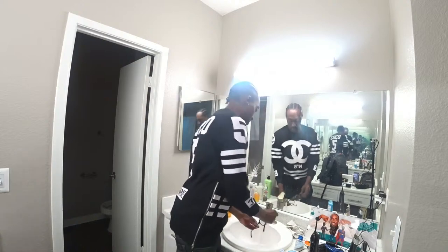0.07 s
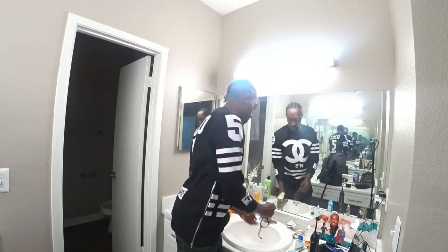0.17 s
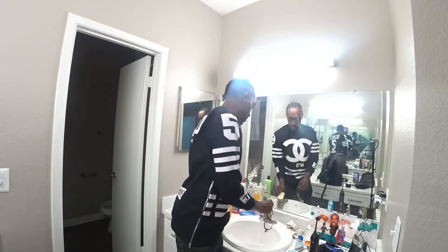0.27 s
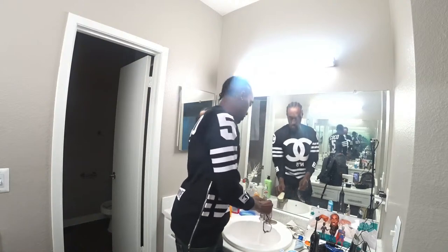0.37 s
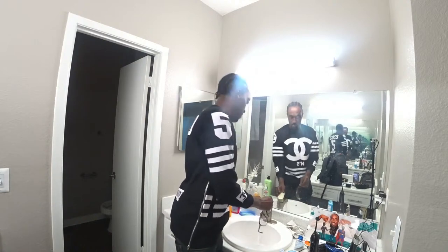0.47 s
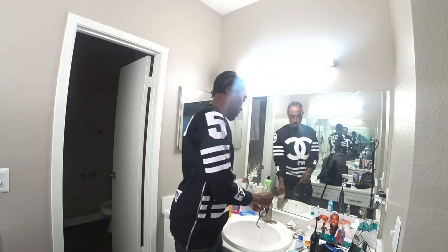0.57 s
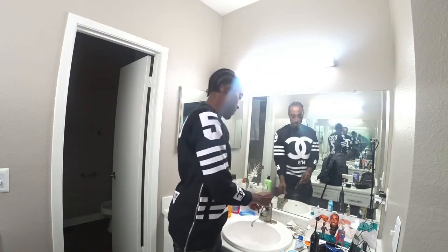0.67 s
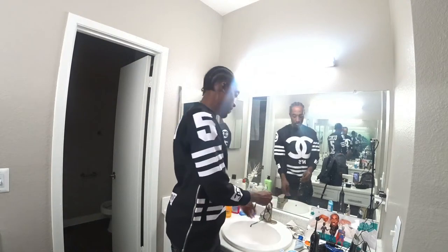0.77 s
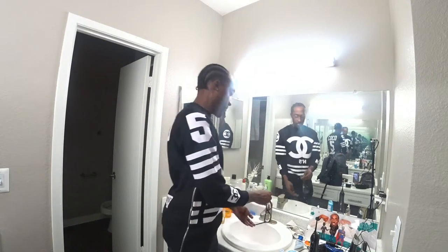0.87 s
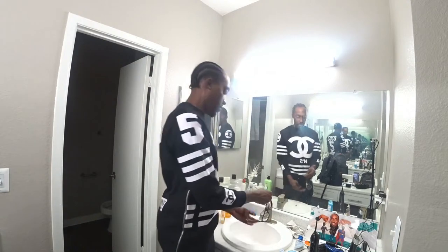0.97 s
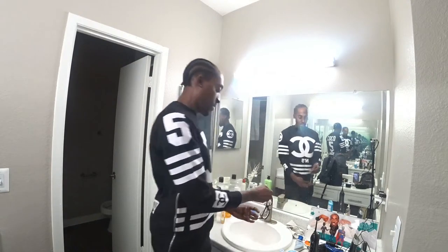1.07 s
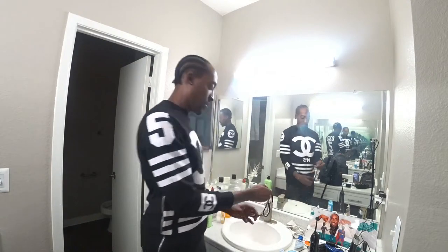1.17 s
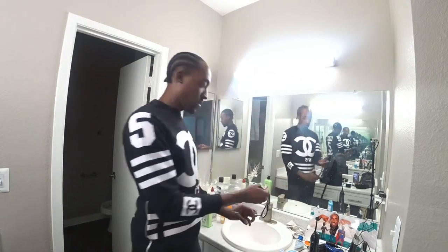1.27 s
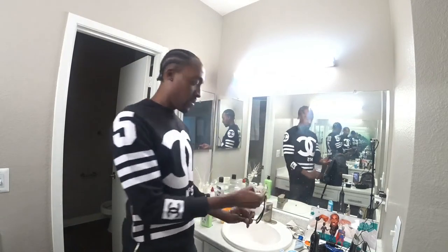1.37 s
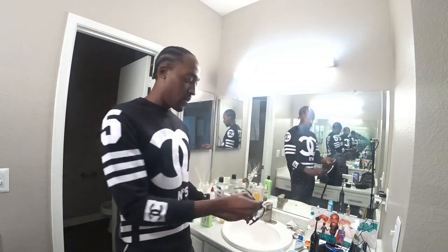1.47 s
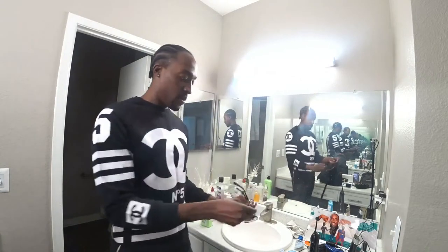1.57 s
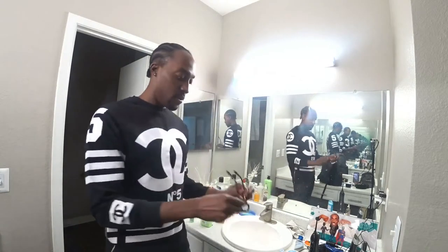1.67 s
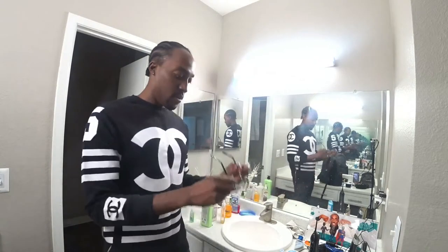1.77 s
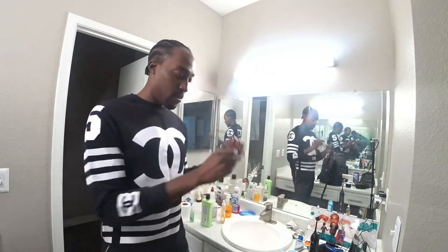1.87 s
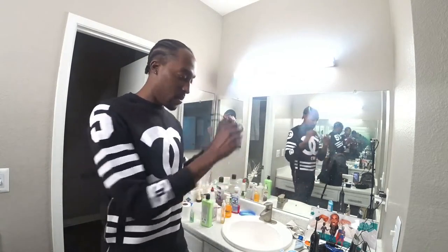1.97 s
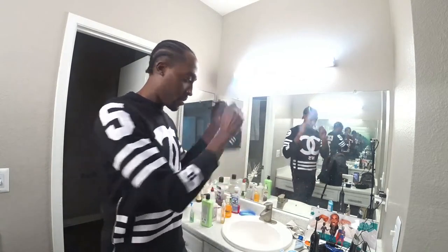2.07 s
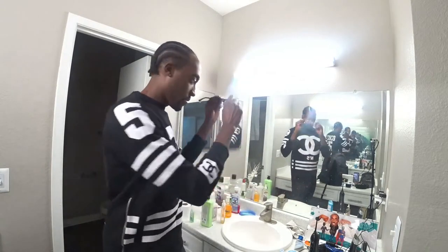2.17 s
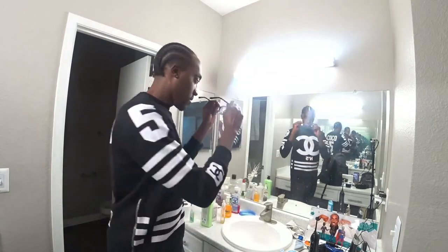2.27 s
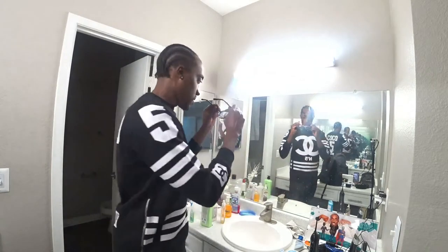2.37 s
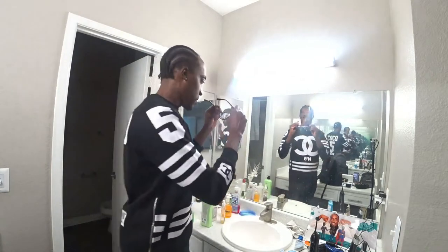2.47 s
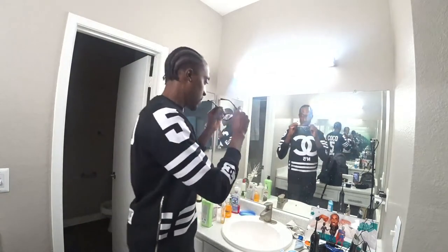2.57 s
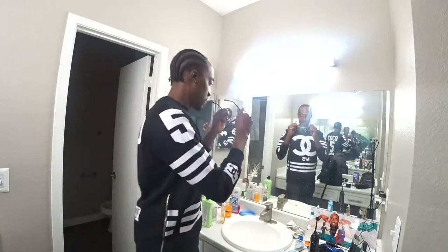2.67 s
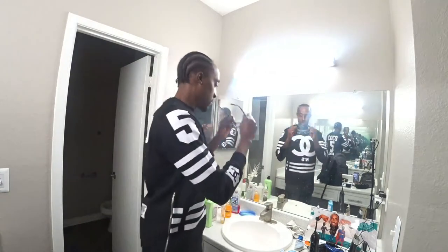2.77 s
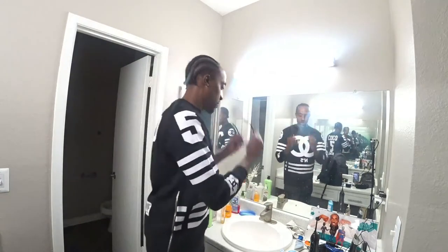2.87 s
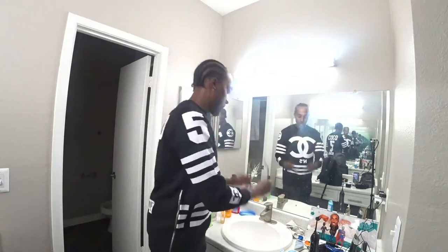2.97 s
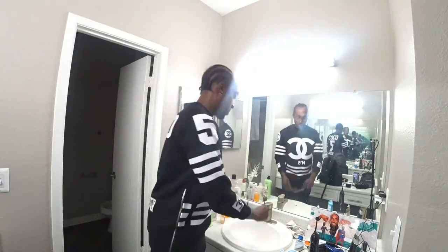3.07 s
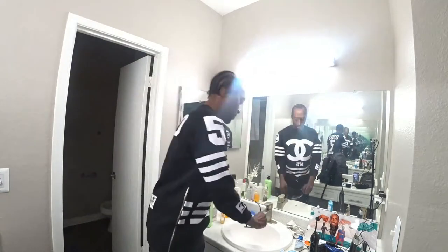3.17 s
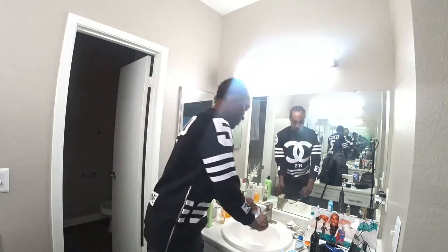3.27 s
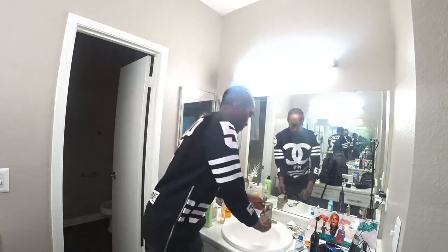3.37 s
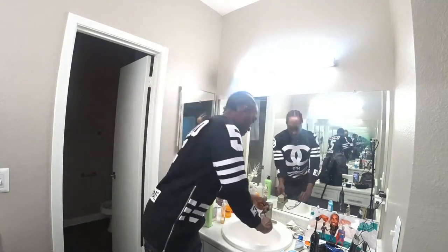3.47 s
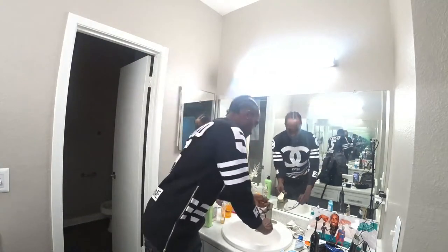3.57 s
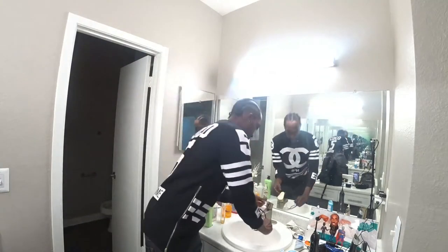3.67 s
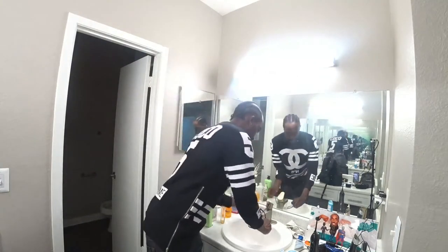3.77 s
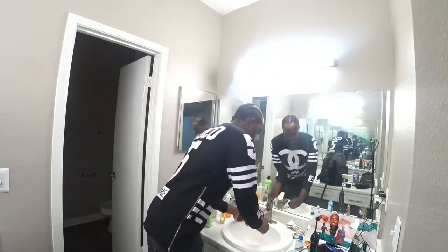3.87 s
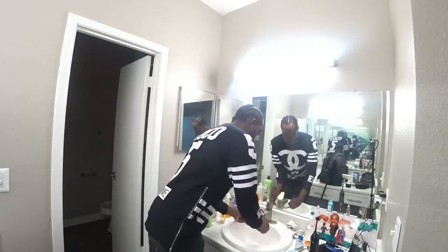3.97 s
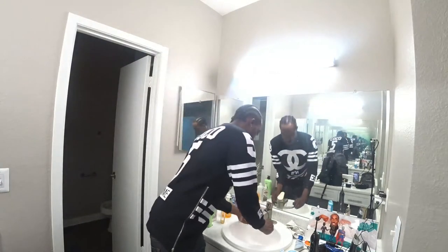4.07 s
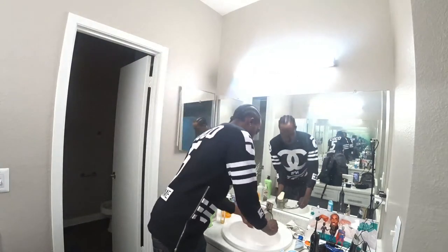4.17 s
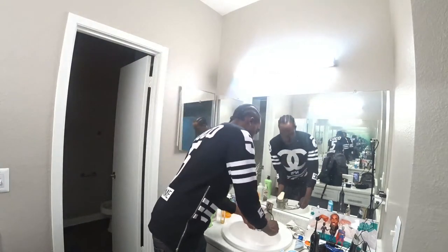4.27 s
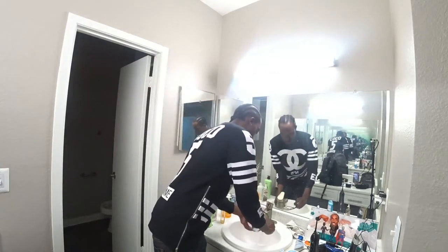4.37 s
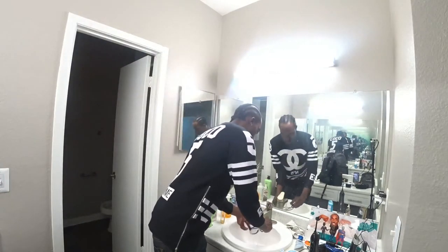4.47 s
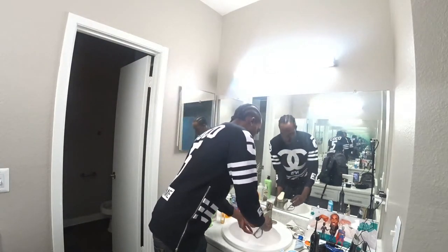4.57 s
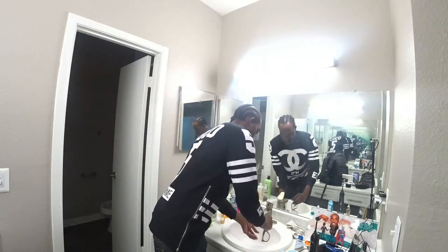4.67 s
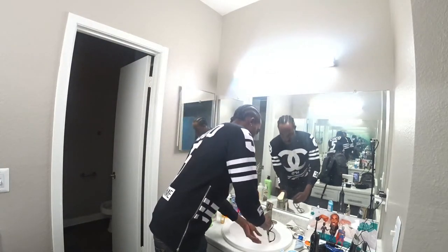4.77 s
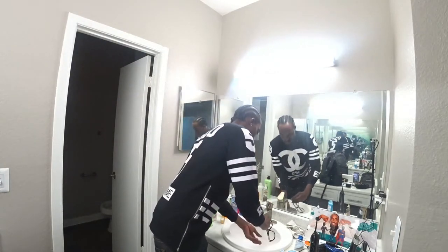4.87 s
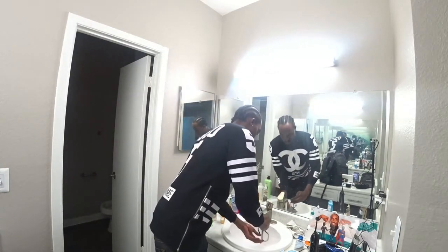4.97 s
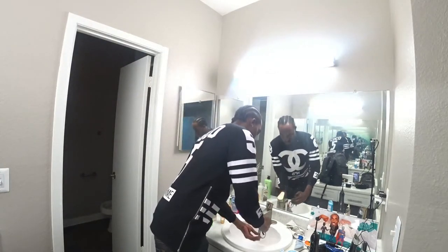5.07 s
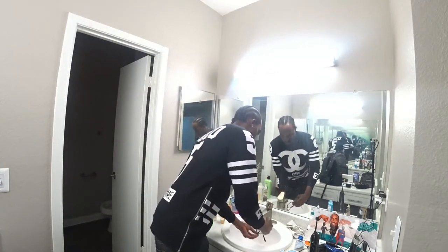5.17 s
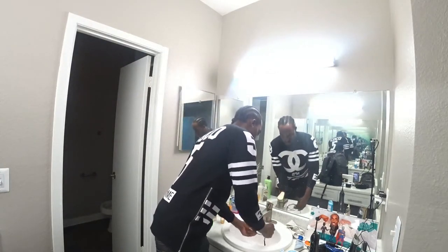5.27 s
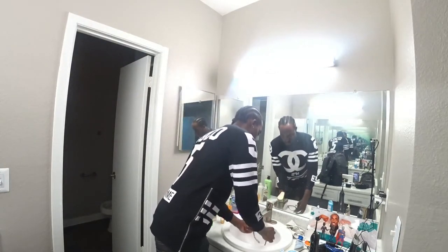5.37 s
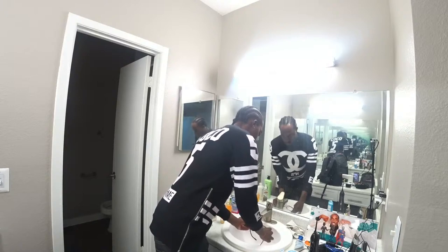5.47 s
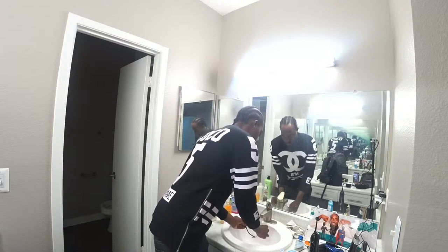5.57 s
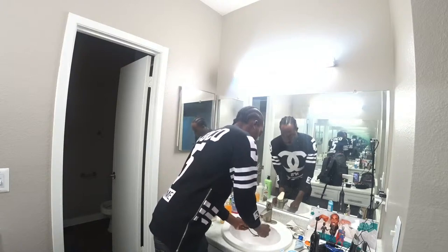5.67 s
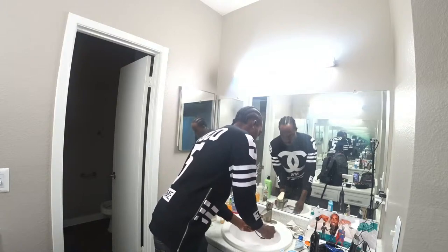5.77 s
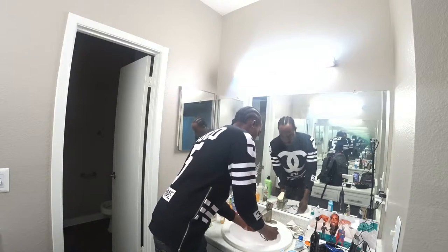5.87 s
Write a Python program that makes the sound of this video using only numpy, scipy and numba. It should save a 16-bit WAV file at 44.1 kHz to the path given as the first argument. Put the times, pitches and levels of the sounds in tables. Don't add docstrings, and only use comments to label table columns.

```python
import sys
import numpy as np
from scipy import signal
from scipy.fft import rfft, irfft
from scipy.io import wavfile
from scipy.ndimage import uniform_filter1d
from numba import njit

SR = 44100
rng = np.random.default_rng(int(sys.argv[2]) if len(sys.argv) > 2 else 0)


def wrap_up_sound(samples):
    columns = np.atleast_2d(samples).T
    tamed = np.clip(columns, -1, 1)
    steps = np.round(tamed * 32767).astype(np.int16)
    wavfile.write(sys.argv[1], SR, steps)


def decibels_to_gain(level_db):
    exponent = np.asarray(level_db, float) / 20
    return 10 ** exponent


N = 261072
TIME = np.arange(N) / SR

# [Hz, dB per Hz]
JET_SPECTRUM = [(2350, 9.5), (4000, -3.5), (7230, 2.5), (9300, 2.5), (10400, 7.5), (13300, 2.5),
                (14000, -2)]
# [Hz, dB per Hz]
SPLASH_SPECTRUM = [(760, -22), (1300, -5.5), (1390, -5.5), (1510, -9.5), (1880, -2), (2140, -3), (2400, -2),
                   (7000, 0), (9100, 13.5), (15400, -120)]
# [Hz, Hz, dB]
BASIN_MODES = [(186, 31, 6.5), (292, 50, -1), (358.5, 4.9, -1.5), (461, 85, 5), (840, 200, 5.5),
               (1016, 87, 1.5), (1737, 51, 4.5), (2380, 110, -30)]
# [s, s, dB, dB, dB]
TAP_OPEN = [
    (-.1, 0.566, -47, -46.5, -53),
    (3.467, 6.5, -46.5, -46, -54.5),
]
# [s, dB]
HAND_IN_JET = [
    (3.65, 2.5),
    (4.08, -1),
    (4.32, 4.5),
    (4.37, -1.5),
    (5.05, 4),
    (5.08, 0.5),
    (5.47, -3),
    (5.52, 1),
    (5.62, -4),
]
# [s, dB, s, s]
WATER_SLAPS = [(.02, -47, 0.3, 0.7), (.462, -59, 0.084, 0.071), (4.105, -42, 0.064, 0.35),
               (4.17, -45, 0.13, .2), (4.189, -25.5, 0.063, 0.089), (4.225, -37, 0.13, 0.4),
               (4.305, -37.5, 0.26, 0.33), (4.53, -42, 0.55, 0.28), (4.612, -36.5, 0.095, 0.14),
               (4.745, -43, 0.25, 0.1), (5.505, -42, 0.087, 0.22), (5.805, -39.5, 0.093, 0.26)]
# [s, dB]
BOWL_SLOSHES = [
    (.22, -57),
    (0.453, -40),
    (3.522, -46),
    (3.82, -64),
    (4.19, -57),
    (4.28, -55),
    (5.565, -48.5),
]
# [Hz, dB]
FAN_TONES = [
    (120, -66.5),
    (654, -70.5),
    (1297, -86),
    (1809, -81),
]
# [Hz, dB per Hz]
AIR_SPECTRUM = [(12, -38), (20, -1), (75, -4), (119, -5.5), (174, -10.5), (468, -13.5), (650, -12),
                (725, -15), (1440, -18), (1790, -18), (4680, -28), (12500, -35), (14000, -42)]
# [s, dB, Hz, dB, Hz]
BLOWS = [(0.348, -40.5, 75, -18, 250), (.447, -38, 115, 8, 430), (.455, -38.5, 150, 3.5, 530),
         (0.4688, -13.5, 76, -24, 162), (.523, -42, 90, -23, 199), (0.57, -43, 109, -24, 200),
         (.645, -43, 70, -8, 200), (.678, -43, 105, -18, 200), (1.472, -36.5, 41.3, -13, 260),
         (2.151, -37.5, 41, -4, 280), (3.297, -38, 99, -20, 249), (3.377, -44, 62, -22, 300),
         (3.452, -40.5, 70, -10, 248), (3.526, -28, 93, -33, 403), (3.814, -41.5, 91.5, -15, 434)]
# [s, dB, Hz, s, dB]
CONTACTS = [(0.4505, -31, 1750, 0.045, -26), (0.4566, -27, 1730, 0.045, -27), (.464, -30, 920, 0.046, -21),
            (0.7885, -57.5, 1620, 0.14, 4.5), (.748, -53, 4500, .04, -12), (.87, -61, 6450, .05, -20),
            (.845, -56, 2800, 0.087, -14), (0.9207, -43.5, 2690, 0.07, -20), (.94, -52, 2800, .06, -20),
            (1.001, -48, 2700, 0.05, -17), (1.2997, -45.5, 2540, 0.07, -18),
            (1.4954, -50.5, 3010, 0.05, -4), (2.4546, -55.5, 3540, 0.037, -9), (2.7915, -58, 2400, .05, -9),
            (3.1035, -55, 2540, 0.09, -26), (3.103, -47, 1040, 0.087, -28), (3.225, -52.5, 2750, 0.045, -3),
            (2.155, -54, 1194, 0.11, -25), (3.363, -45, 2410, 0.16, -18), (4.15, -34.5, 1500, 0.22, -18),
            (4.18, -15, 2890, 0.039, -5), (4.1866, -15.5, 3840, 0.037, -15),
            (4.184, -25.5, 1310, 0.082, -20), (4.196, -16, 2700, .05, -23), (4.2113, -29, 3500, 0.027, -23),
            (4.219, -28, 2980, 0.036, -20), (4.605, -31.5, 2500, .09, -4.5)]
# [times pitch, dB]
OBJECT_MODES = [(1, 10.5), (1.6, 9), (8.1, -6), (0.95, -24), (2.3, 2.5)]
# [s, dB, s, s, dB]
RUSTLES = [(.797, -67, 0.05, 0.29, -4), (1.05, -65, 2.2, 0.67, 14.5), (1.42, -62, 0.92, 0.62, 9.5),
           (1.5, -65.5, 0.42, 0.32, 12.5), (1.69, -71, 0.56, .3, 16), (1.985, -63.5, 0.55, 0.5, 10),
           (2.16, -58, 0.05, 0.31, 1), (2.2, -55, 0.17, 0.27, 2), (2.235, -57, .15, 0.18, 7),
           (2.8, -75, .2, .2, -4), (3.11, -74.5, 0.71, 1.2, 20.5), (3.227, -67, 0.068, 0.63, 14),
           (3.375, -64.5, 0.15, 0.48, 14.5)]
# [s, dB, Hz, s]
DRAIN_BUBBLES = [
    (4.781, -44, 835, 0.052),
    (5.554, -42, 848, 0.051),
    (5.573, -46, 920, 0.05),
    (5.583, -39, 1413, 0.053),
    (5.646, -46.5, 810, 0.098),
    (5.747, -33.5, 1026, 0.073),
    (5.769, -37, 1127, 0.049),
]
# [Hz, dB]
PORT_DIFFERENCE = [(35, -30), (85, -22), (180, -14.5), (350, -9.5), (700, -5.5), (2800, -8), (5600, -4),
                   (10000, -1), (13500, 0)]

OPENING_T60_S, JET_STOP_T60_S, SPLASH_STOP_T60_S = 0.11, 0.48, 0.062
BOWL_STOP_T60_S, DRAIN_T60_S, TRICKLE_DB = 1, 4.6, -11.5
SLOSH_RISE_S, SLOSH_FALL_S = 0.064, 0.16
COUNTER_T60_S, FLOOR_T60_S, FLOOR_BELOW_HZ = 0.083, 0.34, 50
ROOM_T60_S, ROOM_DB = 0.26, -8


def level(x, db):
    return x * decibels_to_gain(db) / np.sqrt(np.mean(x ** 2))


def colour(x, points):
    hz, db = np.transpose(points)
    f = np.maximum(np.fft.rfftfreq(x.shape[-1], 1 / SR), 1)
    gain = decibels_to_gain(np.interp(np.log(f), np.log(hz), db))
    return irfft(rfft(x) * gain, x.shape[-1])


def band(x, hz, width):
    return signal.lfilter(*signal.iirpeak(hz, hz / width, SR), x)


def walk(rate):
    k = int(SR / rate)
    held = np.repeat(rng.standard_normal(N // k + 1), k)
    return 1.39 * uniform_filter1d(uniform_filter1d(held, k), k)[:N]


@njit
def ring(s, hz, t60, size, glide):
    out = np.zeros(N)
    for k in range(len(s)):
        n = int(t60[k] * SR)
        first = int(s[k] * SR)
        p = np.exp(2j * np.pi * hz[k] / SR - np.log(1000) / n)
        turn = np.exp(2j * np.pi * hz[k] * glide / SR / n)
        z = size[k] + 0j
        for i in range(first, min(first + n, N)):
            out[i] += z.imag
            z *= p
            p *= turn
    return out


def swell(s, rise_s, fall_s, hold_s=0.):
    early = np.maximum(s - TIME, 0)
    late = np.maximum(TIME - s - hold_s, 0)
    return np.exp(-np.log(1000) * (early / max(rise_s, .01) + late / max(fall_s, .01)))


def burst(s, t60, rise_s):
    t = np.maximum(TIME - s, 0)
    return (1 - np.exp(-t / rise_s)) * np.exp(-np.log(1000) * t / t60)


def droplets(per_s, low_hz, high_hz, cycles, scatter_db):
    s, pitch = rng.random((int(per_s * N / SR), 2)).T
    hz = low_hz * (high_hz / low_hz) ** pitch
    size = decibels_to_gain(scatter_db * np.minimum(rng.exponential(size=len(s)), 4))
    return level(ring(s * N / SR, hz, cycles / hz, size * np.sqrt(hz), 0.36), 0)


def patchy(x, low_hz, count, own_db, rate):
    centres = low_hz * 2 ** (np.arange(count) / 3)
    return sum(decibels_to_gain(own_db * walk(rate)) * band(x, hz, hz / 4) for hz in centres)


def flow(column, stop_s):
    return sum(decibels_to_gain(row[column]) * swell(row[0], OPENING_T60_S, stop_s, row[1] - row[0])
               for row in TAP_OPEN)


def tap():
    fine_bubbles = colour(droplets(30000, 4000, 14000, 5, 2.5), JET_SPECTRUM)
    jet = patchy(fine_bubbles, 4500, count=6, own_db=2.4, rate=16)
    splash_bubbles = colour(droplets(12000, 1300, 7000, 9, 2.5), SPLASH_SPECTRUM)
    splash = patchy(splash_bubbles, 1500, count=7, own_db=1.5, rate=24)
    gurgle = droplets(1500, 219.5, 2410, 11.9, 1.2)
    basin = 0.44 * gurgle
    for hz, width, db in BASIN_MODES:
        basin = basin + decibels_to_gain(db + 2.3 * walk(16)) * band(gurgle, hz, width) * np.sqrt(hz / width)
    fat_drops = band(splash, 3510, 2400)
    glug = band(basin, 448, 450)

    hiss = flow(column=2, stop_s=JET_STOP_T60_S) * decibels_to_gain(np.interp(TIME, *np.transpose(HAND_IN_JET)))
    trickle = decibels_to_gain(TRICKLE_DB) * flow(column=3, stop_s=DRAIN_T60_S)
    spray = flow(column=3, stop_s=SPLASH_STOP_T60_S) + trickle
    slaps = sum(decibels_to_gain(db) * swell(s, rise, fall) for s, db, rise, fall in WATER_SLAPS)
    slosh = flow(column=4, stop_s=BOWL_STOP_T60_S)
    slosh = slosh + sum(decibels_to_gain(db) * swell(s, SLOSH_RISE_S, SLOSH_FALL_S) for s, db in BOWL_SLOSHES)
    drain = flow(column=4, stop_s=DRAIN_T60_S) * level(glug, -7.5)
    return (hiss * level(jet, 1.3) + spray * level(splash, -3.85)
            + slaps * level(fat_drops, -4) + slosh * level(basin, -2.5) + drain)


def fan():
    tones = 0
    for hz, db in FAN_TONES:
        strength = decibels_to_gain(db + 3 + min(500 / hz, 4) * walk(18))
        speed = 1 + .0015 * walk(12)
        tones = tones + strength * np.sin(2 * np.pi * np.cumsum(hz * speed) / SR)
    gust = decibels_to_gain(.8 * walk(8))
    return tones + gust * level(colour(rng.standard_normal(N), AIR_SPECTRUM), -61)


def thuds():
    s, db, hz, knock_db, knock_hz = np.transpose(BLOWS)
    t60 = np.where(hz < FLOOR_BELOW_HZ, FLOOR_T60_S, COUNTER_T60_S)
    note = ring(s, hz, t60, decibels_to_gain(db + 6), 0.) - ring(s, hz, .4 * t60, decibels_to_gain(db + 6), 0.)
    rumble_noise, knock_noise = rng.standard_normal((2, N))
    rumble = level(band(band(rumble_noise, 71, 110), 73, 110), -14)
    out = note + rumble * sum(decibels_to_gain(a) * burst(t, 0.37, 0.0088) for t, a in zip(s, db))
    for t, a, f in zip(s, db + knock_db, knock_hz):
        low = level(band(band(knock_noise, f, .6 * f), f, .6 * f), -3)
        f_high = 4.1 * f
        high = level(band(band(knock_noise, f_high, .6 * f_high), f_high, .6 * f_high), -5)
        out = out + decibels_to_gain(a) * burst(t, .2, .007) * (low + high)
    return signal.lfilter(*signal.butter(2, 38, "high", fs=SR), out)


def ticks():
    s, db, hz, t60, treble_db = np.transpose(CONTACTS)
    out = sum(ring(s, hz * ratio, .5 * t60, decibels_to_gain(db + d - 20), 0.) for ratio, d in OBJECT_MODES)
    body, crack = rng.standard_normal((2, N))
    crack = level(band(crack, 7800, 5000), 0)
    for t, a, f, d, treble in zip(s, db, hz, t60, treble_db):
        main = 2.1 * band(band(body, f, .5 * f), f, .5 * f)
        upper = .9 * band(body, 1.88 * f, .5 * f)
        out = out + decibels_to_gain(a) * burst(t, d, 0.0012) * (main + upper + decibels_to_gain(treble) * crack)
    return out


def cloth():
    hiss = level(band(droplets(15000, 4000, 12000, 4, 2), 8500, 7000), -3)
    rustle = level(band(droplets(4000, 710, 6000, 2.9, 2.3), 1400, 6700), -10.5)
    return sum(decibels_to_gain(db) * swell(s, rise, fall) * (hiss + decibels_to_gain(rustle_db) * rustle)
               for s, db, rise, fall, rustle_db in RUSTLES)


def bubbles():
    s, db, hz, t60 = np.transpose(DRAIN_BUBBLES)
    pop = ring(s, hz, t60, decibels_to_gain(db + 0.5), 0.044)
    neighbour = ring(s + 0.00494, 1.3 * hz, t60, decibels_to_gain(db - 4), 0.11)
    return pop + neighbour


def room(x):
    t = np.arange(int(.5 * SR)) / SR
    decay = np.exp(-np.log(1000) * t / ROOM_T60_S) * (t > .003)
    echoes = rfft(rng.standard_normal((2, len(t))) * decay)
    mid, side = irfft(echoes / np.sqrt(uniform_filter1d(np.abs(echoes) ** 2, size=40)))
    tail = signal.lfilter(*signal.butter(1, 250, "high", fs=SR), signal.fftconvolve(x, mid)[:N])
    both = (x + decibels_to_gain(ROOM_DB) * tail) / np.sqrt(1 + decibels_to_gain(2 * ROOM_DB))
    apart = colour(signal.fftconvolve(x, side)[:N], PORT_DIFFERENCE)
    return np.array([both + apart, both - apart])


def scene():
    return room(tap() + fan() + thuds() + ticks() + cloth() + bubbles())


def thinned(x, from_hz, band_hz, scatter_db, hole_share):
    hz, _, frames = signal.stft(x, SR, nperseg=2048)
    which = np.maximum((hz - from_hz) // band_hz + 1, 0).astype(int)
    rough, luck = rng.standard_normal((2, len(x), 40, frames.shape[-1]))
    rough = np.sqrt(2) * uniform_filter1d(rough, size=2)
    luck = uniform_filter1d(luck, size=2)
    power = np.sum(np.abs(frames[0, which > 7]) ** 2, axis=0)
    busy = power > np.mean(power) / 10
    dropped = (luck < np.quantile(luck, hole_share)[:, None, None]) & busy
    kept = np.where(dropped, .003, decibels_to_gain(scatter_db * np.minimum(rough, 1.1) * (.65 + .35 * busy)))
    kept[:, 0] = 1
    kept[:, 1:8] = decibels_to_gain(.4 * scatter_db * rough[:, 1:8] * busy)
    return signal.istft(frames * kept[:, which], SR, nperseg=2048)[1][:, :N]


def band_limit(x):
    return signal.sosfilt(signal.butter(12, 13520, fs=SR, output="sos"), x)


def record(dry):
    ports = np.array([dry[0] + dry[1], dry[0] - dry[1]]) / 2
    mid, side = thinned(ports, from_hz=1570, band_hz=690, scatter_db=5, hole_share=np.array([.21, .42]))
    return band_limit(np.array([mid + side, mid - side]))


dry = scene()
out = record(dry)
wrap_up_sound(out)
```